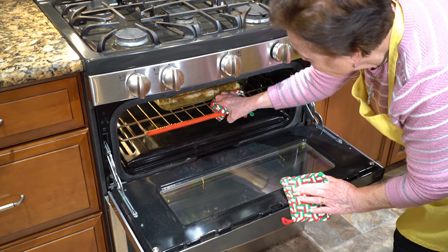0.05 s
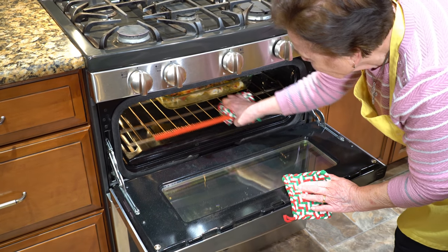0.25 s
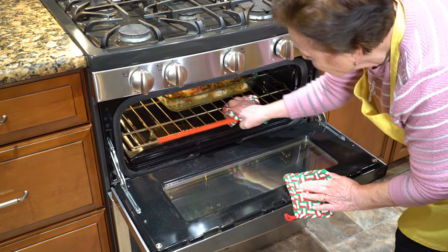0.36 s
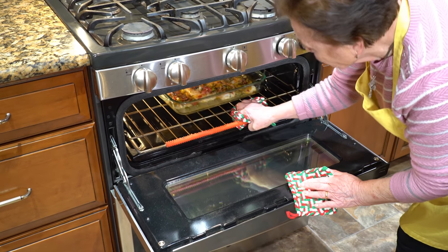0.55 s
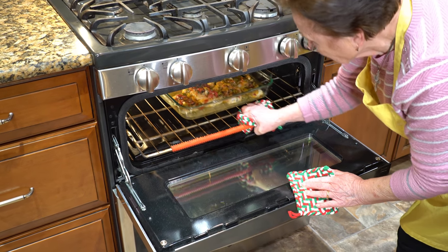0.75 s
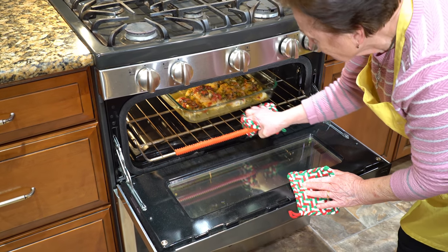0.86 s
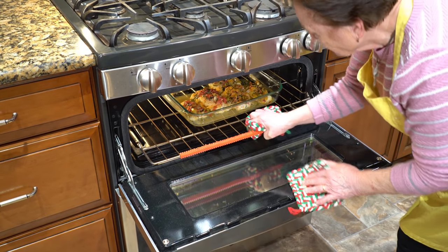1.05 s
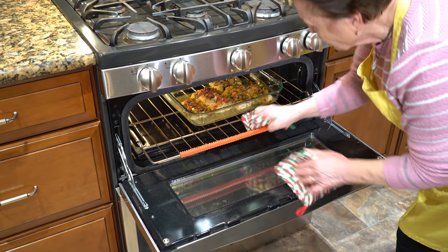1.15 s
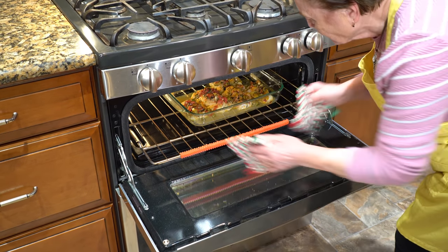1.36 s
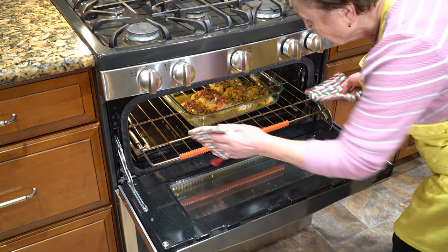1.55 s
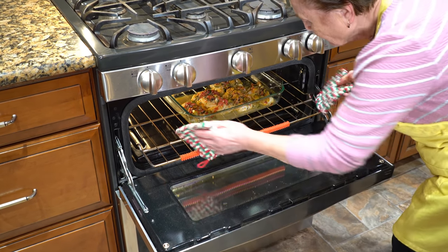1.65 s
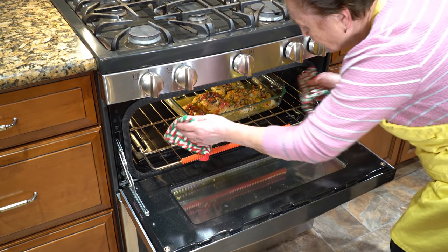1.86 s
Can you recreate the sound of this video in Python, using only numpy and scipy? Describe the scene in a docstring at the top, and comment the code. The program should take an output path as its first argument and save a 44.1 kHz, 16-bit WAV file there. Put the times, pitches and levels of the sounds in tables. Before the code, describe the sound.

A wire oven rack is tugged along metal runners with hollow clunks and a rough scrape, then glides out more smoothly and stops softly; padded hands bump and cloth rustles, heard close in a quiet kitchen.

```python
"""In a quiet kitchen with a faint brush of cloth, a wire oven rack carrying a glass dish is pulled out.
A rough tug, then a smoother glide, drags it along metal runners: stick-slip impacts excite wires and walls.
Blows on the guides ring the steel liner as decaying modes, and low decaying sines boom as the load shifts.
The glide stops with a soft thud; padded hands bump and tick, and pot holders and sleeves rustle as
grains of friction shaped by a spectrum."""
import sys
import numpy as np
from scipy import signal
from scipy.fft import rfft, irfft, next_fast_len
from scipy.io import wavfile

SR = 44100
rng = np.random.default_rng(int(sys.argv[2]) if len(sys.argv) > 2 else 0)


def master(y):
    """Save y as 16-bit WAV."""
    cut = np.clip(np.atleast_2d(y).T, -1, 1)
    pcm = np.round(cut * 32767)  # scale
    wavfile.write(sys.argv[1], SR, pcm.astype(np.int16))


N = 83790

SLIPS_PER_S, SLIP_SPREAD_DB = 3500, 2.5  # metal dragged on the runners


def amp(db):
    """Logarithmic level: decibels to linear gain."""
    return 10 ** (np.asarray(db) / 20)


def unit(x):
    """Power normalisation: x at rms 1."""
    return x / np.sqrt(np.mean(x ** 2) + 1e-20)


def along(points, hz):
    """Logarithmic frequency scale: (hz, value) points interpolated on a log axis."""
    f, v = np.transpose(points)
    return np.interp(np.log(hz + 1), np.log(f + 1), v)


def level(rows):
    """Amplitude envelope: (time_s, level_db) points as a gain per sample, silent outside them."""
    s, db = np.transpose(rows)
    return amp(np.interp(np.arange(N) / SR, s, db, left=-120, right=-120))


def since(start_s):
    """Causality: seconds elapsed since an onset, held at zero before it."""
    return np.maximum(np.arange(N) / SR - start_s, 0)


def filtered(x, response):
    """Linear filtering: the spectrum of x times a response given as a function of frequency."""
    m = next_fast_len(N + SR // 2)
    return irfft(rfft(x, m) * response(np.fft.rfftfreq(m, 1 / SR)), m)[:N]


def coloured(x, colour):
    """Spectral shaping: x weighted by (hz, level_db) points, at rms 1."""
    return unit(filtered(x, lambda hz: amp(along(colour, hz))))


def resonate(x, modes):
    """Modal resonance: x convolved with damped (hz, width_hz, level_db) modes of unit total energy."""
    t = np.arange(SR // 2) / SR
    ring = np.zeros(len(t))
    for k, (hz, width_hz, db) in enumerate(modes):
        decay = np.sqrt(width_hz) * np.exp(-np.pi * width_hz * t)
        ring += (-1) ** k * amp(db) * decay * np.sin(2 * np.pi * hz * t)
    return signal.fftconvolve(x, ring / np.linalg.norm(ring))[:N]


def slips(rate, spread_db):
    """Stick-slip friction: tiny random impacts of uneven size and either sign, at rms 1."""
    struck = rng.random(N) < rate / SR
    sign = rng.choice([-1, 1], N)
    size = amp(spread_db * np.clip(rng.standard_normal(N), -2, 2))
    return unit(struck * sign * size)


def oven_echo(x):
    """Early reflection: dense echoes inside the steel box comb the sound and make it tinny."""
    echo_db, t60_s = -10, .03
    t = np.arange(SR // 10) / SR
    flutter = rng.standard_normal(len(t)) * amp(-60 * t / t60_s) * (t > .001)
    echo = signal.fftconvolve(x, flutter / np.linalg.norm(flutter))[:N]
    echo = filtered(echo, lambda hz: hz ** 2 / (hz ** 2 + 1200 ** 2))  # the bass is not echoed
    return (x + amp(echo_db) * echo) / np.sqrt(1 + amp(echo_db) ** 2)


def room_air():
    """Stationary noise: steady kitchen air with a fixed spectrum."""
    # spectrum of the air: hz, level_db (per Hz, relative)
    air_colour = [(25, -6.5), (75, 7.5), (130, -5.5), (350, -4.5), (620, -25), (850, -5), (1250, -29),
                  (3400, -25.5), (15000, -32.5)]
    return amp(-69) * coloured(rng.standard_normal(N), air_colour)


def kitchen(x):
    """Reverberation: a short diffuse tail whose decay depends on frequency, quickest near 4 kHz."""
    # decay time of the room: hz, t60_s
    room_t60 = [(100, 0.33), (1000, 0.54), (4000, 0.083), (12000, 0.33)]
    hz, t, z = signal.stft(rng.standard_normal(SR // 2), SR, nperseg=256)
    decay = amp(-60 * t / along(room_t60, hz)[:, None])
    tail = signal.istft(z * decay, SR, nperseg=256)[1]
    tail = np.pad(tail, (SR // 200, 0))  # the tail starts 5 ms late
    return signal.fftconvolve(x, tail / np.linalg.norm(tail))[:N]


def cloth():
    """Granular friction: pot holders and sleeves brush rack and door, with a few brighter swishes."""
    # rustle: time_s, level_db
    rustle_level = [(0, -72), (.08, -72.5), (.15, -76), (1.12, -64), (1.2, -63.5), (1.245, -57), (1.3, -59),
                    (1.359, -54.5), (1.44, -60), (1.58, -69), (1.66, -69.5), (1.74, -68), (1.82, -68),
                    (1.89, -62)]
    # spectrum of the rustle: hz, level_db (per Hz, relative)
    rustle_colour = [(30, -6), (75, -2), (180, -7.5), (330, -7.5), (550, -11), (800, -14), (1800, -17),
                     (4800, -25), (9000, -32.5), (15000, -42)]
    # light swishes of fabric: centre_s, half_length_s (standard deviation), level_db
    swishes = [(0.238, 0.011, -59.5), (0.267, 0.011, -49), (1.325, 0.027, -68.5), (1.575, 0.071, -75.5),
               (1.655, 0.0072, -80)]
    # spectrum of the swishes: hz, level_db (per Hz, relative)
    swish_colour = [(1500, -31), (3500, 6), (6000, 1.5), (9500, -3), (15000, -9)]
    grains_per_s, spread_db = 6000, 3
    t = np.arange(N) / SR
    s, db = np.transpose(rustle_level)
    rustle = coloured(slips(grains_per_s, spread_db), rustle_colour) * amp(np.interp(t, s, db))
    swells = sum(amp(db) * np.exp(-.5 * ((t - s) / half_s) ** 2) for s, half_s, db in swishes)
    return rustle + coloured(slips(grains_per_s, spread_db), swish_colour) * swells


def hands(attack_s=0.0096):
    """Damped impact: padded hands ring rack and door with a soft onset; faint ticks are noise bursts."""
    # padded bumps on the rack and the door: start_s, level_db
    bumps = [(1.224, -46.5), (1.245, -50), (1.277, -41.5), (1.317, -52), (1.385, -54), (1.641, -52.5),
             (1.668, -58), (1.699, -58.5), (1.865, -60)]
    # modes the bumps ring: hz, level_db (relative), t60_s
    door = [(161, -17, 0.063), (252.7, -3, 0.12), (298, -8, 0.1), (369, -2, 0.066), (456, -8, 0.074)]
    # tiny ticks as the hand lets go: start_s, level_db
    ticks = [(1.259, -65), (1.287, -65)]
    # spectrum of the ticks: hz, level_db (per Hz, relative)
    tick_colour = [(2000, -10), (8000, -20), (11000, 0), (12500, 3), (14000, -14)]
    tick_t60_s = 0.027
    out = np.zeros(N)
    for start_s, db in bumps:
        t = since(start_s)
        ring = np.zeros(N)
        for hz, mode_db, t60_s in door:
            ring += amp(mode_db - 60 * t / t60_s) * np.sin(2 * np.pi * (hz * t + rng.random()))
        out += amp(db) * ring * (1 - np.exp(-t / attack_s))
    for start_s, db in ticks:
        t = since(start_s)
        burst = coloured(rng.standard_normal(N), tick_colour)
        out += burst * (t > 0) * amp(db - 60 * t / tick_t60_s)
    return out


def thuds(attack_s=0.0082):
    """Free decay of a low mode: soft booms as the load shifts and flexes the oven and the rack stops."""
    # booms: start_s, level_db, pitch_hz, t60_s
    booms = [(.015, -59, 70, 0.29), (0.256, -22, 121.8, 0.1), (0.301, -27.5, 100.2, 0.1),
             (.797, -42.5, 107.4, 0.17), (1.092, -41, 85, 0.23), (1.645, -52.5, 159.3, 0.2),
             (1.672, -48.5, 83, 0.096)]
    out = np.zeros(N)
    for start_s, db, hz, t60_s in booms:
        t = since(start_s)
        out += amp(db - 60 * t / t60_s) * np.sin(2 * np.pi * hz * t) * (1 - np.exp(-t / attack_s))
    return out


def shudder():
    """Forced vibration: runner chatter drives the sheet-steel walls, and hard pulling the cavity."""
    # shaking of the walls: time_s, level_db (before the final cut)
    wall_level = [(.19, -59.5), (.215, -44), (.26, -41.5), (.33, -41), (.39, -32.5), (.44, -50.5),
                  (.5, -43), (.56, -39.5), (.62, -58), (.69, -50), (.735, -40), (.84, -50.5), (.93, -45.5),
                  (.97, -47), (1.03, -44.5), (1.1, -59), (1.19, -76)]
    # wall modes: hz, width_hz, deep_db (rack deep inside), half_out_db (rack half out), both relative
    walls = [(261.3, 22, 3, -5), (302.8, 9.7, 0.5, -5.5), (348.6, 24, 0, -1.5), (371.5, 16, -6.5, -2.5),
             (413, 22, -2.5, -3), (479, 24, -16, -7), (528, 23, 6, -0.5), (569, 16, -13, -12),
             (636, 48, -21, -9)]
    # rumble of the oven cavity: time_s, level_db (before the final cut)
    rumble_level = [(.18, -59), (.21, -50.5), (.27, -40), (.38, -44), (.45, -47), (.52, -51), (.61, -44),
                    (.69, -51), (.74, -44.5), (.87, -50), (.94, -54), (1.07, -56), (1.19, -67)]
    # low modes of the oven cavity: hz, width_hz, level_db (relative)
    cavity = [(76, 14, 1), (87, 14, 1), (119, 16, -1), (160, 20, -3)]
    half_out_s, changeover_s = 0.46, 0.11  # the wall tone crossfades around this time
    chatter = slips(1500, spread_db=1.5) * level(wall_level)
    half_out = np.clip(.5 + (np.arange(N) / SR - half_out_s) / changeover_s, 0, 1)
    deep = resonate(chatter * (1 - half_out), [(hz, w, db) for hz, w, db, _ in walls])
    shallow = resonate(chatter * half_out, [(hz, w, db) for hz, w, _, db in walls])
    boom = resonate(slips(1500, spread_db=4.5) * level(rumble_level), cavity)
    return amp(-3) * (deep + shallow + boom)


def binding():
    """Resonant friction: a short, narrower rasp rings the runner as the rack rides up to the guide."""
    # binding of the runner: time_s, level_db (before the final cut)
    bind_level = [(.49, -46.5), (.535, -39), (.555, -36.5), (.59, -48), (.62, -74)]
    # modes of the runner: hz, width_hz, level_db (relative)
    runner = [(1214, 85, 6.5), (1565, 100, 3.5), (1930, 94, 5), (2270, 130, -27), (2600, 42, 2.5),
              (3220, 97, 0)]
    return amp(-8.5) * resonate(slips(SLIPS_PER_S, SLIP_SPREAD_DB) * level(bind_level), runner)


def knocks():
    """Impact excitation: a half-sine push dents and rings the liner, with a bright metal click."""
    # blows on the guides: start_s, level_db, contact_ms,
    # click_db (relative to the blow, before halving), dent_hz
    blows = [(0.2847, -19.5, 1.4, -25, 523), (.2910, -22, 2.47, -10, 430), (.3260, -22, 0.71, -35, 466),
             (0.3831, -31.5, 0.35, -6, 405), (0.5546, -21, 0.94, -12, 363), (.5890, -21, 0.84, -11, 351),
             (0.728, -32, 1.5, -24, 373)]
    # modes of the steel liner: hz, level_db (relative), t60_s
    liner = [(87, -14, 0.2), (117, -7.5, 0.038), (165, -2.5, 0.032), (279, -21.5, 0.072),
             (371.5, -15.5, 0.12), (470, -7.5, 0.031), (537.6, -20.5, 0.25)]
    # spectrum of the click: hz, level_db (per Hz, relative)
    click_colour = [(300, -34), (950, 2.5), (1400, 10), (2500, -2), (4000, -1.5), (7000, -6),
                    (15000, -15.5)]
    dent_t60_s, dent_db = 0.034, -0.5  # the struck spot flexes and dies at once
    click_t60_s, click_rise_s = 0.057, 0.0005
    bass_cut_hz = 89  # the oven's panels radiate little below this
    out = np.zeros(N)
    for start_s, db, contact_ms, click_db, dent_hz in blows:
        t = since(start_s)
        body = np.zeros(N)
        for hz, mode_db, t60_s in [*liner, (dent_hz, dent_db, dent_t60_s)]:
            body += amp(mode_db - 60 * t / t60_s) * np.sin(2 * np.pi * hz * t)
        contact = np.arange(256) / SR * 1000 / contact_ms  # 0 to 1 while the surfaces touch
        push = np.sin(np.pi * np.minimum(contact, 1))
        click = coloured(rng.standard_normal(N), click_colour)
        click *= (1 - np.exp(-t / click_rise_s)) * amp(click_db - 60 * t / click_t60_s)
        out += amp(db) * (np.convolve(body, push / push.sum())[:N] + .5 * click)
    return filtered(out, lambda hz: hz ** 4 / (hz ** 4 + bass_cut_hz ** 4))


def scrape(stroke, colour, wires, wires_db):
    """Stick-slip excitation: a gritty rasp, and wire modes that fade as the contact crosses their nodes."""
    wire_width_hz = 20
    nodes_per_s, node_depth = 6, .7  # mean rate; each wire mode has its own
    force, t = level(stroke), np.arange(N) / SR
    grit = coloured(slips(SLIPS_PER_S, SLIP_SPREAD_DB), colour)
    rasp = unit(oven_echo(grit)) * force
    drive = slips(SLIPS_PER_S, spread_db=3) * force
    ring, r = np.zeros(N), np.exp(-np.pi * wire_width_hz / SR)  # r: pole radius
    for hz, db in wires:
        rate = nodes_per_s * (.5 + rng.random())
        contact = 1 + node_depth * np.sin(2 * np.pi * (rate * t + rng.random()))
        poles = [1, -2 * r * np.cos(2 * np.pi * hz / SR), r * r]
        mode = signal.lfilter([1, 0, -1], poles, drive * contact)
        ring += amp(db) * np.sqrt((1 - r * r) / 2) * mode
    return rasp + amp(wires_db) * ring / np.linalg.norm(amp([db for _, db in wires]))


def tug():
    """Friction-driven modes: the first, rough stroke, with the rack deep in the oven."""
    # scrape of the stroke: time_s, level_db
    stroke = [(.195, -74.5), (.215, -57.5), (.255, -40.5), (.29, -37), (.34, -36.5), (.365, -45.5),
              (.387, -42.5), (.41, -52), (.485, -52.5), (.53, -50.5), (.56, -45), (.6, -49.5), (.635, -60),
              (.7, -70)]
    # spectrum of the rasp: hz, level_db (per Hz, relative)
    rasp_colour = [(150, 0), (280, -6), (560, 10.5), (760, -1.5), (1050, 4.5), (1400, -4.5), (2000, -0.5),
                   (3200, -3), (4800, -8.5), (8000, -16.5), (15000, -27.5)]
    # rack wires: hz, level_db (relative)
    wires = [(688, 8.5), (835, 5), (1028, 5), (1100, -12), (1373, 1.5), (1900, 5), (2030, 4.5), (2270, -4),
             (2918, 10.5), (3063, -1), (3400, -21), (3623, 0), (3780, -19), (3941, 0.5), (5120, -27),
             (5496, 0), (6621, -15), (8452, -16), (8900, -6)]
    return oven_echo(scrape(stroke, rasp_colour, wires, wires_db=-6.5))


def glide():
    """Friction-driven modes: the second, smooth stroke, with the rack half out."""
    # scrape of the stroke: time_s, level_db
    stroke = [(.66, -68), (.7, -55.5), (.735, -44), (.77, -46), (.86, -46), (.93, -47), (.97, -49),
              (1.065, -52), (1.1, -64.5), (1.16, -79)]
    # spectrum of the rasp: hz, level_db (per Hz, relative)
    rasp_colour = [(150, -4.5), (280, 3.5), (560, 8.5), (760, 2.5), (1050, 3.5), (1500, -1.5), (2000, 0),
                   (2700, -4.5), (4000, -6), (6300, -12.5), (9500, -16.5), (15000, -26)]
    # rack wires: hz, level_db (relative)
    wires = [(880, -5), (1003, -17), (1044, 11.5), (1357, 2.5), (1430, 5.5), (1868, 3), (1990, -14),
             (2220, -11), (2400, -9), (3052, -1), (3480, -4), (4020, -4), (4129, -18), (5690, -4.5),
             (6099, -6), (7020, -22), (8360, -21), (9329, -16)]
    return oven_echo(scrape(stroke, rasp_colour, wires, wires_db=-9.5))


def scene():
    """Superposition: both strokes and their knocks with a room tail, plus hands, cloth and still air."""
    rack = tug() + glide() + binding() + shudder() + knocks() + thuds()
    room = amp(-10.5) * kitchen(rack)
    return (rack + room + hands() + cloth() + room_air())[None]


def record(dry):
    """Band limitation: nothing passes at or above the top frequency."""
    top_hz = 15750
    return filtered(dry[0], lambda hz: hz < top_hz)[None]


dry = scene()
out = record(dry)
master(out)
```